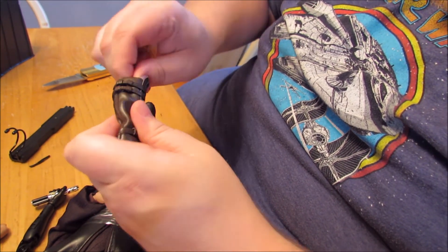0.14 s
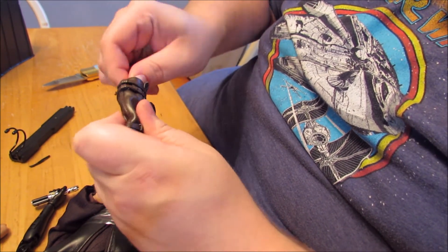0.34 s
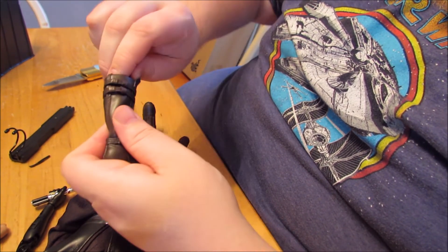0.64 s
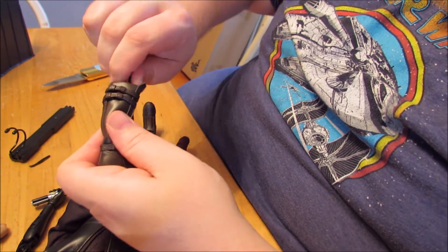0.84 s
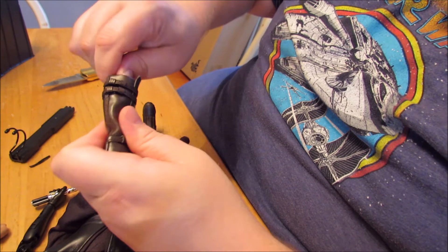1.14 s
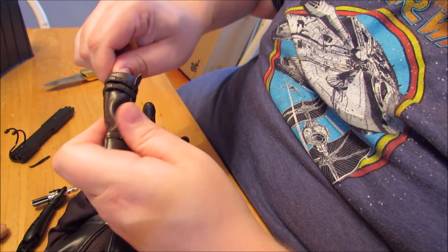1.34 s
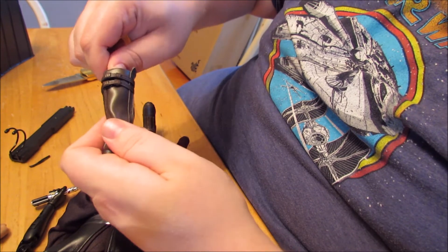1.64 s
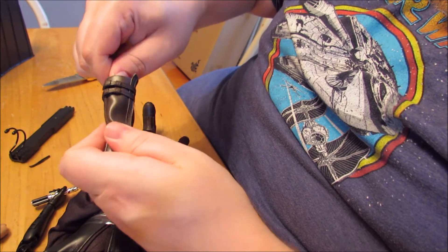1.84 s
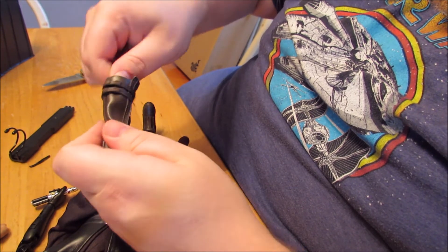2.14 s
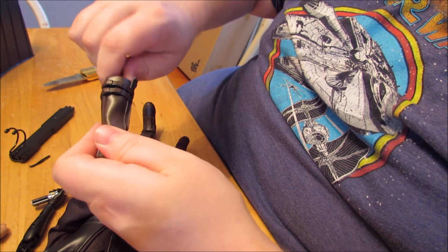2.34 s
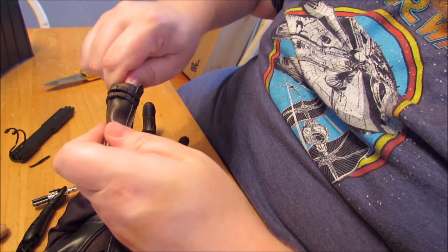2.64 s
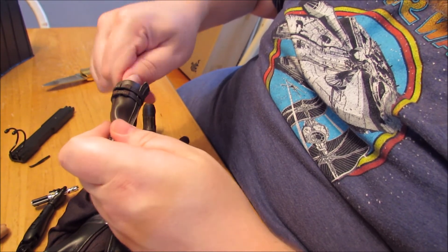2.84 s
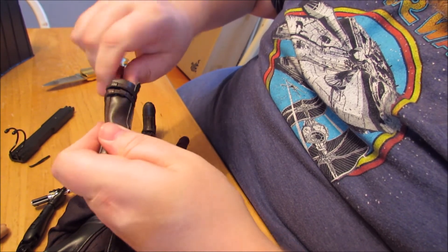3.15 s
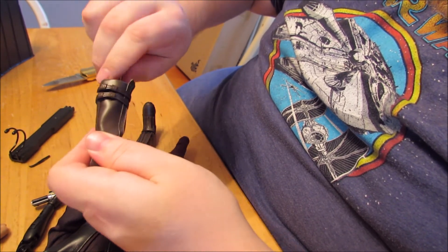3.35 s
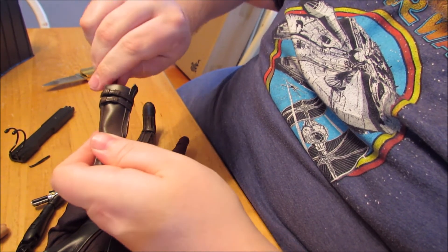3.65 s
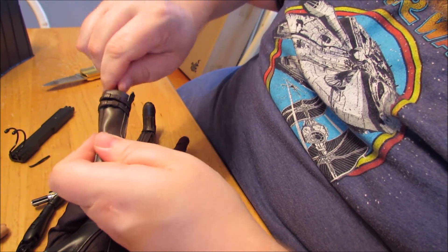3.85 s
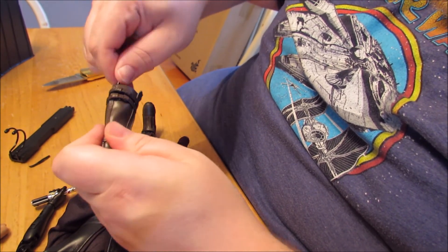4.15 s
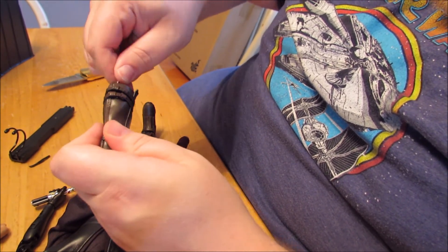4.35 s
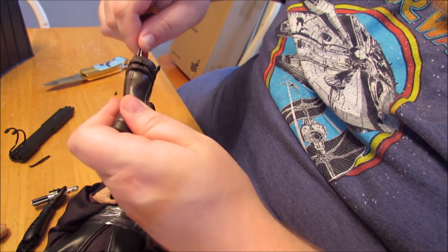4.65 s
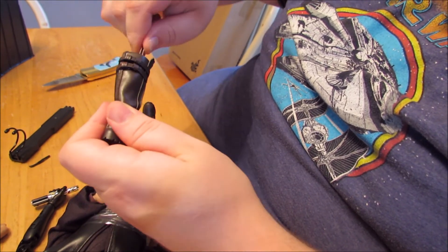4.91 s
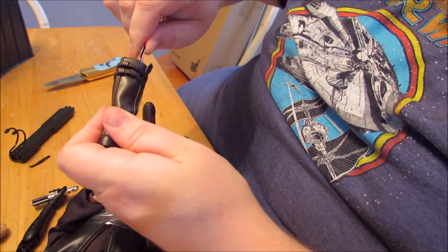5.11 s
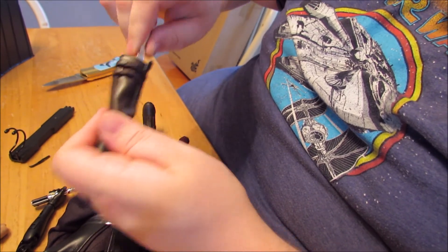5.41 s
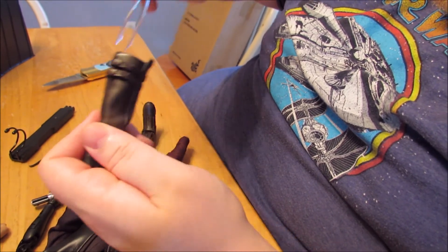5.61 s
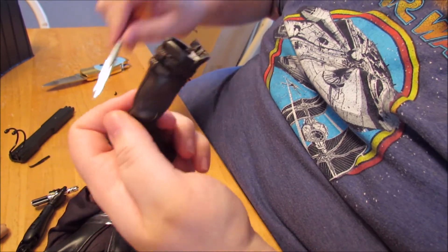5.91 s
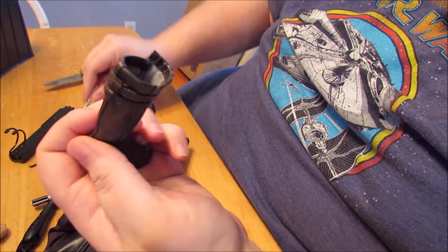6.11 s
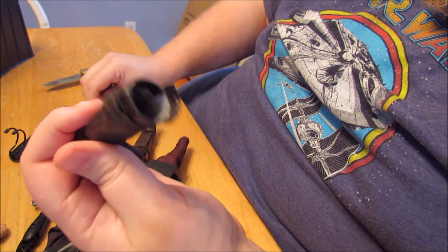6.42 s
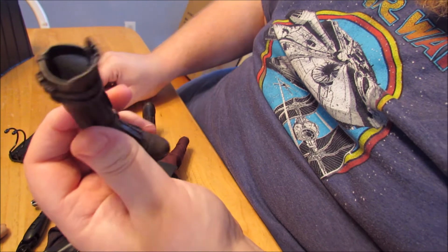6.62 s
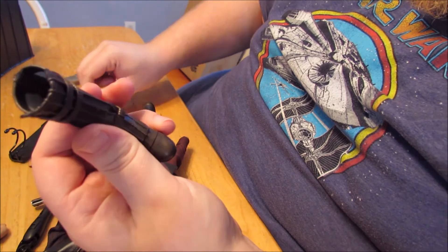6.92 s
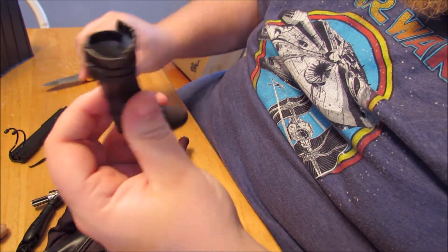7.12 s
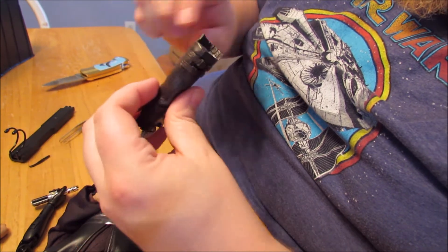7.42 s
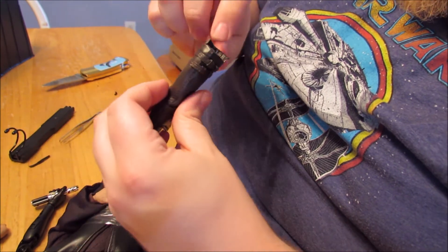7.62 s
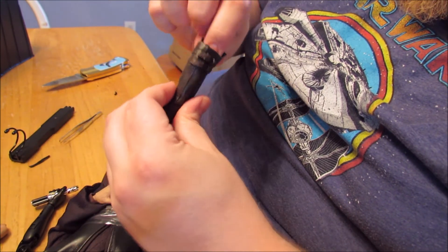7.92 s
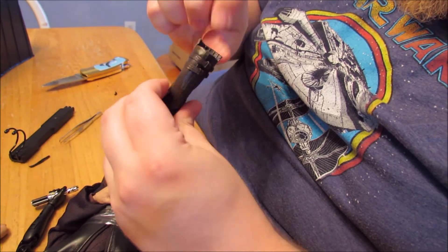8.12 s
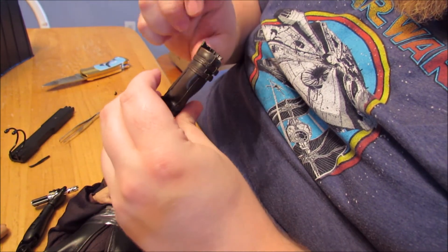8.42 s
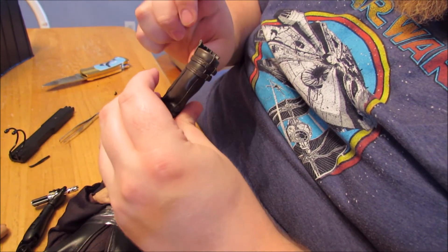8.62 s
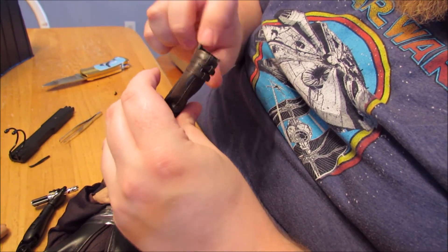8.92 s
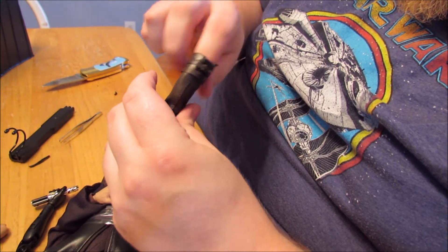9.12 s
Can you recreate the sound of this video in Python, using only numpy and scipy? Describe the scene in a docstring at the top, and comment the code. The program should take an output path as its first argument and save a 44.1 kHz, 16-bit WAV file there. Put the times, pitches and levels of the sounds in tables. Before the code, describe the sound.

Sparse tiny plastic clicks from tweezers picking inside a hollow plastic boot, then steel tweezers clatter onto a wooden table; quiet room hum and soft finger rubbing.

```python
"""Tweezers in a plastic boot

Close stereo microphones in a small quiet room: steel tweezers pick inside a hollow plastic boot, as air and wall modes.
They snap free, slide on a wooden table, drop and rattle to rest, as knocks, wood grains and ringing steel.
Fingers rub the plastic as friction grains. Room air, mains hum and preamplifier hiss lie under it all,
and the recorder's gain ducks after loud hits."""
import sys
import numpy as np
from scipy import signal
from scipy.fft import rfft, irfft
from scipy.io import wavfile
from scipy.ndimage import uniform_filter1d

SR = 44100
rng = np.random.default_rng(int(sys.argv[2]) if len(sys.argv) > 2 else 0)


def store_wav(level_fs):
    """Save 16-bit WAV to argv[1]."""
    pcm = np.round(np.clip(np.atleast_2d(level_fs), -1, 1) * 32767)
    wavfile.write(sys.argv[1], SR, pcm.T.astype(np.int16))


def to_linear_factor(level_db):
    """Convert decibel levels (scalar or array-like) to linear amplitude factors."""
    exponent = np.asarray(level_db, float) / 20
    return 10 ** exponent


N = 408366

# picks at the boot: t/s, drive of the hollow modes level/dB, drive of the wall modes level/dB,
# bright crack before its filter level/dB, left over right for hollow and wall before the room level/dB
TICKS = [(0.2085, -45, -46, -52, 2), (0.442, -55, -54, -37.5, 3), (0.4747, -44, -45, -44, 1),
         (0.9582, -51, -49, -42, -2), (0.972, -69, -37, -32, 1), (1.117, -31.5, -20, -25, 4.5),
         (1.2778, -38, -60, -46, -3), (1.3348, -63, -44, -38, 1), (1.354, -34.5, -38.5, -41, -2),
         (1.3776, -34, -57, -39, -1), (1.9026, -38, -30.5, -35, 4), (1.9233, -43, -45, -36, 5),
         (2.2338, -42, -51, -45, -1), (2.3062, -57, -54, -39, -2), (2.3197, -45.5, -50, -40, 4),
         (2.4918, -55, -44, -34.5, -1), (2.673, -47, -46, -37, 3), (2.91, -46, -46, -42, 2),
         (3.062, -48, -52, -39, 1), (3.1454, -48, -52, -36, -1), (3.549, -50, -52, -40, 0),
         (3.6684, -24.5, -42, -45, 0), (4.102, -47, -39.5, -34, -3), (4.189, -37.5, -40.5, -52, -1),
         (4.2088, -55, -33.5, -45, 1), (4.48, -42.5, -55, -52, 0), (5.325, -58, -49, -36, -4),
         (5.4844, -36, -25, -43, 0), (5.4881, -37, -29, -33, 0), (5.5696, -57, -42, -31.5, 3),
         (7.7646, -61, -47, -44.5, -1), (8.1209, -21, -33.5, -27.5, -3), (8.137, -39.5, -54, -52, 3),
         (9.0498, -34, -46, -50, -3)]
# air modes in the boot: f/Hz, level/dB, t60/s
HOLLOW_MODES = [(1152, -13.5, 0.038), (1310, 0.5, 0.0095), (1790, -10.5, .01)]
# modes of the plastic wall: f/Hz, level/dB, t60/s
WALL_MODES = [(1940, -14, 0.0075), (2290, 1, 0.005), (3250, -7.5, 0.0036), (3980, -7, 0.0029)]
FAINT_TICKS_PER_S, FAINT_TICK_DB = 4.0, -46   # level before the crack filter

# tweezers struck: t/s, drive of the wood level/dB, drive of the steel level/dB
BLOWS = [(5.4744, -27.5, -2.5), (6.1607, -20.5, -13.5), (6.1632, -17, -17), (6.1782, -17.5, -22),
         (6.1958, -17, -29), (6.2488, -21, -38), (6.258, -28, -36.5), (6.3065, -13.5, -38),
         (6.472, -4, -20.5), (6.4739, -1, -20.5), (6.4776, -3.5, -11.5), (6.512, -5.5, -16.5),
         (6.5159, -1, -19.5), (6.5381, -1, -17.5), (6.557, -5.5, -22), (6.5766, -6.5, -22),
         (6.599, -4.5, -22.5), (6.6292, -6, -22), (6.663, -10, -23.5)]
# chatter on the table, one span slid in the fingers and one let go:
# t/s, drive of the wood level/dB, drive of the steel level/dB
CHATTER = [
    [(6.159, -29.5, -29), (6.211, -34.5, -47), (6.24, -36.5, -57), (6.268, -30, -42.5), (6.294, -40.5, -53),
     (6.308, -34, -47.5), (6.324, -35.5, -50.5), (6.428, -56, -69.5), (6.46, -55.5, -65)],
    [(6.481, -22.5, -31.5), (6.55, -14, -21.5), (6.65, -20.5, -25), (6.72, -39.5, -49.5), (6.86, -74, -72)],
]
# modes of the steel once let go: f/Hz, level/dB, t60/s
STEEL_MODES = [(5650, -20.5, 0.093), (6708, -18.5, .25), (7150, -3, 0.36), (7430, -5, 0.58),
               (8520, 1.5, 0.0069), (9631, 4.5, 0.81), (10450, 4.5, 0.082), (10450, -8, 0.28),
               (11400, -10, 0.022), (12600, -8.5, .03), (14230, -3, 0.16), (14500, -10.5, .25)]
# colour of the table top: f/Hz, level/dB (relative)
WOOD_COLOUR = [(150, -48), (250, -26), (537, -17), (1020, -8), (1170, -12.5), (1320, -5), (1510, -3.5),
               (4520, -3), (6370, -9.5), (7410, -7.5), (9000, -17), (11700, -33), (19800, -120)]
# modes of the table top: f/Hz, level/dB, t60/s
TABLE_MODES = [(312, -41.5, 0.052), (430, -42.5, 0.036), (585, -33, 0.053), (724, -34.5, 0.045),
               (1202, -26.5, 0.054), (1520, -31, 0.052), (1776, -25, 0.046), (2146, -26, 0.059),
               (2565, -27, 0.037), (3066, -40.5, 0.033), (3880, -34.5, .04), (4400, -34.5, 0.044)]
LET_GO_S, HELD_T60_S = 6.47, .006
REST_S, REST_DB_PER_S = 6.72, 124   # lying flat, the steel is damped by the wood
SOFT_FROM_S, SOFT_HZ = 6.19, 1800   # laid down flat, the held tweezers touch softly
SNAP_OVER_S = 6.0
# sliding, the held tweezers sing on one note that sags as the grip loosens
SING_FROM_S, SING_HZ, SING_SAG_HZ_PER_S = 6.16, 4100, 2500
SING_WOBBLE_HZ, SING_DB = 220, -12   # top of the wobble band; level against the wood chatter

# fingers shifting their grip on the boot; they rest while the tweezers are put down:
# t/s, dull rub level/dB, bright rub level/dB
GRIP = [
    [(0.0, -56, -55.5), (0.31, -66, -68.5), (0.83, -62, -64), (1.31, -61.5, -66), (1.58, -73, -73),
     (1.97, -63, -65), (2.11, -68, -68.5), (3.0, -63.5, -68), (3.55, -70, -71.5), (4.1, -58.5, -63.5),
     (4.6, -72, -70), (5.4, -74, -71.5), (5.6, -58, -65.5), (5.846, -85, -67.5), (6.15, -65, -61.5)],
    [(7.2, -72.5, -72.5), (7.574, -62, -63), (8.3, -72.5, -67), (8.9, -75, -73), (9.26, -61.5, -64)],
]
# single swipes and slips: peak t/s, dull rub level/dB, bright rub level/dB, rise t/s, fall t/s
SWIPES = [(0.575, -59, -60, .1, 0.034), (2.672, -56, -55.5, .025, 0.04), (3.048, -66, -65, .025, 0.13),
          (3.546, -73, -65, .05, 0.088), (4.194, -52.5, -65, .04, 0.11), (4.498, -57, -52, .08, 0.098),
          (5.33, -67, -58, .12, 0.02), (5.435, -75, -55.5, 0.032, .03), (5.466, -53, -39, 0.011, 0.012),
          (5.495, -41, -52, 0.011, 0.054), (5.565, -57, -52, .08, 0.036), (8.115, -66, -50, 0.013, .006),
          (9.05, -54.5, -50.5, .015, 0.023), (9.169, -59, -49, .02, 0.46)]
SWIPE_RANGE_DB = 20   # a swipe climbs and sinks this far in each rise and fall time

ROOM_T60_S, ROOM_TREBLE_T60_S, ROOM_DB, FIRST_ECHO_S = 0.33, 0.19, -11, 0.0041
BOOT_ROOM_DB = -3   # the boot is nearer than the table, so drier
# colour of the room air: f/Hz, level/dB (relative)
AIR_COLOUR = [(15, -47.5), (25, -6.5), (86, -11), (188, -7), (240, -8), (260, -8), (289, -10), (322, -10),
              (782, -13), (919, -12), (1900, -18.5), (2850, -24.5), (7910, -31), (12500, -37.5),
              (15500, -40)]
AIR_DB = -51.5
# likeness of the room air at the two microphones: f/Hz, likeness (-1 to 1)
LIKENESS = [(60, -0.86), (130, -0.3), (290, -0.43), (640, -0.4), (1410, -0.17), (3100, 0.043),
            (6820, -0.027), (15000, -0.83)]
# mains lines before the final tilt to the right: f/Hz, level/dB, right over left level/dB
HUM_LINES = [(57, -73, 3.5), (117, -78.5, -2), (240.3, -58, 2)]
HISS_DB = -69   # flat noise of the preamplifier


def ticks():
    """Each pick rings the air in the boot and its wall briefly, and cracks in the treble."""
    s, hollow_db, wall_db, crack_db, pan_db = np.transpose(TICKS)
    at = np.round(s * SR).astype(int)
    body = np.zeros((2, N))
    strengths = rng.normal(0, 2, (len(at), len(WALL_MODES)))
    for side, lean_db in enumerate([pan_db / 2, -pan_db / 2]):
        for hz, db, t60 in HOLLOW_MODES:
            body[side] -= ring(strikes(at, hollow_db + lean_db + db), hz, t60)
        for k, (hz, db, t60) in enumerate(WALL_MODES):
            body[side] -= ring(strikes(at, wall_db + lean_db + db + strengths[:, k]), hz, t60)
    crack = crunch(at, crack_db - 5.5, t60=0.017) + strikes(at, crack_db)
    faint = rng.random(N) < FAINT_TICKS_PER_S / SR
    crack += to_linear_factor(FAINT_TICK_DB + rng.normal(0, 3, N)) * faint
    return above(body, 930) + band(crack, 4300, 10100)


def tweezers():
    """Blows and chattering contacts drive both the wooden table and the steel."""
    contacts = grains(1800, spread_db=3.5, own=0.91)
    at = np.round(np.transpose(BLOWS)[0] * SR).astype(int) - 4
    free = np.arange(N) > LET_GO_S * SR
    out = above(wood(at, free, contacts), 175) + above(steel(at, free, contacts), 6000)
    # the table lies further left than the boot: the right microphone hears it later
    on_table = np.arange(N) > SNAP_OVER_S * SR
    out[1] = np.where(on_table, np.roll(out[1], 2), np.roll(out[1], 1))
    return out


def wood(at, free, contacts):
    """Knocks and contact grains take the colour of the table top and ring its modes."""
    s, wood_db, _ = np.transpose(BLOWS)
    soft = (np.arange(N) > SOFT_FROM_S * SR) & ~free
    knocks = crunch(at, wood_db - 12.5, t60=0.019) - strikes(at, wood_db)
    knocks = knocks * ~soft + band(knocks * soft, 101, SOFT_HZ)
    drive = span_gain(CHATTER, column=1)
    chatter = drive * contacts * np.where(soft, .6, 1)
    buzz = drive * rms_one(coloured(contacts, WOOD_COLOUR))
    out = coloured(knocks, WOOD_COLOUR) + to_linear_factor(-0.5) * buzz * np.where(soft, .7, 1)
    out += to_linear_factor(8.0) * band(buzz * soft, 500, 1450)
    # the hand's weight rumbles in the table
    out += to_linear_factor(-8.0) * span_gain(CHATTER[:1], column=1) * rms_one(band(contacts, 150, 380))
    strengths = blow_strengths(len(TABLE_MODES))
    for k, (hz, db, t60) in enumerate(TABLE_MODES):
        # the hand's weight drives the low modes harder
        pressed_db = np.where((s < LET_GO_S) & (hz < 800), 11.0, 0)
        hits = np.array([strikes(at, wood_db + pressed_db + db + strengths[:, k, c]) for c in range(2)])
        shaken = to_linear_factor(db - 5.0 + 11.2 * ~free * (hz < 800)) * chatter * rng.standard_normal(N)
        out += ring(hits + shaken, hz, t60)
    return out


def steel(at, free, contacts):
    """Every blow rings the steel very briefly; once let go it also rings on, until the wood damps it."""
    steel_db = np.transpose(BLOWS)[2]
    drive = span_gain(CHATTER, column=2)
    resting = to_linear_factor(-REST_DB_PER_S * np.maximum(np.arange(N) / SR - REST_S, 0))
    out = to_linear_factor(5.5) * drive * ~free * rms_one(band(contacts, 5900, 13000))
    out += ~free * strikes(at, steel_db)
    strengths = blow_strengths(len(STEEL_MODES))
    for k, (hz, db, t60) in enumerate(STEEL_MODES):
        hits = np.array([strikes(at, steel_db + db - 9 + strengths[:, k, c]) for c in range(2)])
        out += ring(hits, hz, HELD_T60_S)
        shaken = to_linear_factor(db - 30.5) * drive * contacts * rng.standard_normal(N)
        out += resting * ring((shaken + to_linear_factor(-17) * hits) * free, hz, t60)
    return out


def singing():
    """Narrow noise round a sinking pitch, as loud as the slide drives it."""
    t = np.maximum(np.arange(N) / SR - SING_FROM_S, 0)
    phase = 2 * np.pi * np.cumsum(SING_HZ - SING_SAG_HZ_PER_S * t) / SR
    wobble = rms_one(band(rng.standard_normal((2, N)), 12, SING_WOBBLE_HZ))
    note = wobble[0] * np.sin(phase) + wobble[1] * np.cos(phase)
    return to_linear_factor(SING_DB) * span_gain(CHATTER[:1], column=1) * note


def rub():
    """Dense fine friction grains, dull on the wall of the boot and bright on the skin."""
    dull = rms_one(band(grains(3000, spread_db=5.0, own=1.0), 730, 2740))
    bright = rms_one(band(grains(9000, spread_db=4.5, own=0.91), 3700, 11400))
    dull_gain = span_gain(GRIP, column=1) + swipes(column=1)
    bright_gain = span_gain(GRIP, column=2) + swipes(column=2)
    return dull_gain * dull + bright_gain * bright


def swipes(column):
    """Each swipe swells to its peak and dies away, straight in dB."""
    t, out = np.arange(N) / SR, np.zeros(N)
    for row in SWIPES:
        peak_s, rise_s, fall_s = row[0], row[3], row[4]
        away = np.where(t < peak_s, (peak_s - t) / rise_s, (t - peak_s) / fall_s)
        out += to_linear_factor(row[column] - SWIPE_RANGE_DB * np.minimum(away, 10))
    return out


def room(x):
    """After a gap, a diffuse dying tail, other for each channel, duller as it dies."""
    t = np.arange(SR // 2) / SR
    noise = rng.standard_normal((2, 2, len(t)))
    tail = band(noise[0], 250, 4000) * to_linear_factor(-60 * t / ROOM_T60_S)
    tail += band(noise[1], 2800, 15000) * to_linear_factor(-60 * t / ROOM_TREBLE_T60_S)
    tail *= np.clip((t - FIRST_ECHO_S) / 0.0018, 0, 1)
    tail /= np.sqrt((tail ** 2).sum() / 2)
    return to_linear_factor(ROOM_DB) * signal.fftconvolve(x[None], tail, axes=1)[:, :N]


def air():
    """Steady noise, in the bass more in the difference of the two microphones than in their sum."""
    hz = np.fft.rfftfreq(N, 1 / SR)
    mid, side = rfft(rng.standard_normal((2, N))) * to_linear_factor(at_hz(AIR_COLOUR, hz))
    alike = np.clip(at_hz(LIKENESS, hz), -.99, .99)
    pair = np.sqrt(1 + alike) * mid + np.sqrt(1 - alike) * side * [[1], [-1]]
    return to_linear_factor(AIR_DB) * rms_one(irfft(pair, N))


def hum():
    """Mains lines are sines that waver a little in level together."""
    t, out = np.arange(N) / SR, np.zeros((2, N))
    waver = to_linear_factor(0.67 * rms_one(band(rng.standard_normal(N), 1.1, 4.8)))
    for hz, db, pan_db in HUM_LINES:
        lean = to_linear_factor(np.array([[-pan_db], [pan_db]]) / 2)
        line = np.sin(2 * np.pi * hz * t + np.array([[0], [1.2]]))
        out += to_linear_factor(db) * np.sqrt(2) * waver * lean * line
    return out


def rms_one(x):
    """Scales to unit power."""
    return x / np.sqrt(np.mean(x ** 2) + 1e-20)


def span_gain(tables, column):
    """Gain of one dB column over all spans, silent between them."""
    t, out = np.arange(N) / SR, np.zeros(N)
    for rows in map(np.array, tables):
        out += to_linear_factor(np.interp(t, rows[:, 0], rows[:, column], left=-200, right=-200))
    return out


def at_hz(points, hz):
    """Reads a spectrum table on a log frequency axis."""
    table_hz, value = np.transpose(points)
    return np.interp(np.log(hz + 1), np.log(table_hz), value)


def coloured(x, points):
    """Minimum-phase colouring, so that nothing sounds before a hit."""
    cepstrum = irfft(at_hz(points, np.linspace(0, SR / 2, 2049)) * np.log(10) / 20)
    cepstrum[1:2048] *= 2
    cepstrum[2049:] = 0
    kernel = irfft(np.exp(rfft(cepstrum)))
    return signal.fftconvolve(x, kernel[None] / np.abs(kernel).max(), axes=1)[:, :N]


def band(x, low_hz, high_hz):
    """Butterworth band-pass."""
    return signal.sosfilt(signal.butter(2, [low_hz, high_hz], "band", fs=SR, output="sos"), x)


def above(x, hz):
    """High-pass: small things radiate no bass."""
    return signal.sosfilt(signal.butter(4, hz, "high", fs=SR, output="sos"), x)


def ring(clicks, hz, t60):
    """A two-pole resonator: a unit click sets off a dying sine that starts at height 1."""
    r, w = to_linear_factor(-60 / (t60 * SR)), 2 * np.pi * hz / SR
    return signal.lfilter([0, np.sin(w)], [1, -2 * r * np.cos(w), r * r], clicks + 1e-18)


def strikes(at, db):
    """A train of one-sample clicks."""
    clicks = np.zeros(N)
    clicks[at] = to_linear_factor(db)
    return clicks


def blow_strengths(modes):
    """Each blow drives each mode unevenly in dB, and each microphone hears it a little differently."""
    shared = rng.normal(0, 2.5, (len(BLOWS), modes, 1))
    return shared + rng.normal(0, 1.9, (len(BLOWS), modes, 2))


def crunch(at, db, t60):
    """Short dying bursts of noise, partly other at each microphone."""
    t, out = np.arange(600) / SR, np.zeros((2, N))
    for i, gain, puff in zip(at, to_linear_factor(db), rng.standard_normal((len(at), 3, 600))):
        out[:, i:i + 600] += gain * (puff[0] + .5 * puff[1:]) * to_linear_factor(-60 * t / t60)
    return out


def grains(per_s, spread_db, own):
    """Random clicks of uneven size, a share of them heard apart at each microphone; rms 1."""
    sizes = to_linear_factor(spread_db * np.minimum(rng.exponential(1, (3, N)), 4))
    signs = rng.choice([-1, 1], (3, N))
    clicks = sizes * signs * (rng.random((3, N)) < per_s / SR)
    return rms_one(clicks[0] + own * clicks[1:])


def scene():
    """Near sources with their room tail, over the air and hum."""
    boot = ticks() + rub()
    table = (tweezers() + singing()) * to_linear_factor(np.array([[.5], [-.5]]))   # a little to the left
    sent = (to_linear_factor(BOOT_ROOM_DB) * boot + table).mean(axis=0)
    background = (air() + hum()) * to_linear_factor(np.array([[-.6], [.6]]))   # a little to the right
    return boot + table + room(sent) + background


def roll_off(x):
    """The treble ends steeply here."""
    return signal.sosfilt(signal.butter(12, 16370, fs=SR, output="sos"), x)


def record(dry):
    """Preamplifier hiss joins; gain control ducks after loud sound and creeps back; peaks clip."""
    dry = dry + to_linear_factor(HISS_DB) * rng.standard_normal(dry.shape)
    # mean power of the last 2000 samples
    power = uniform_filter1d((dry ** 2).mean(axis=0), size=2000, origin=999)
    power_db = 10 * np.log10(power + 1e-12)
    over_db = .5 * np.maximum(power_db + 37.5, 0)   # half of what exceeds -37.5 dB
    creep_db = 44.6 * np.arange(N) / SR   # recovery in dB per second
    duck_db = np.maximum.accumulate(over_db + creep_db) - creep_db
    r = np.exp(-1 / (0.024 * SR))   # smoothed over 24 ms
    duck_db = signal.lfilter([1 - r], [1, -r], duck_db)
    return roll_off(np.clip(dry * to_linear_factor(-duck_db), -1, 1))


dry = scene()
out = record(dry)
store_wav(out)
```